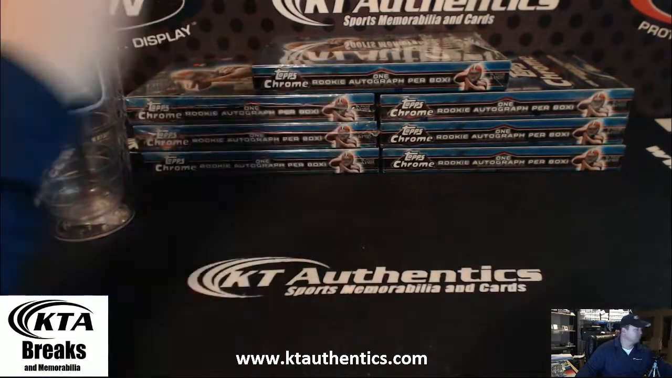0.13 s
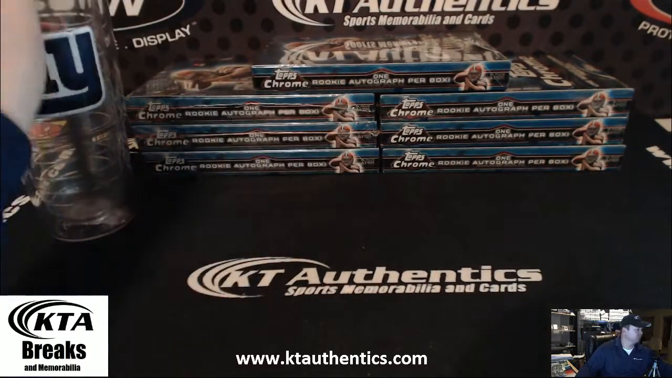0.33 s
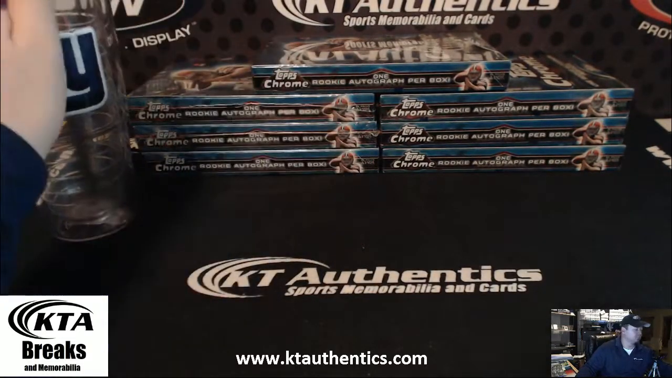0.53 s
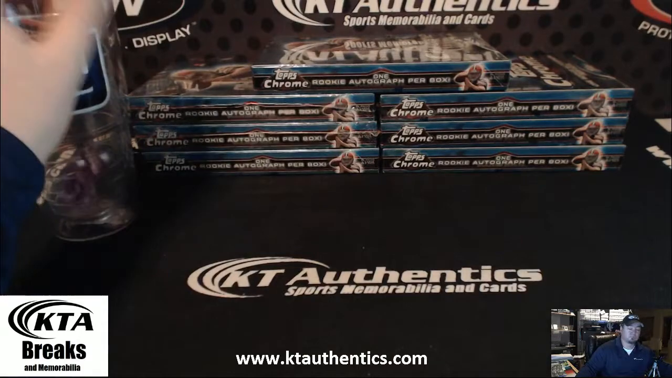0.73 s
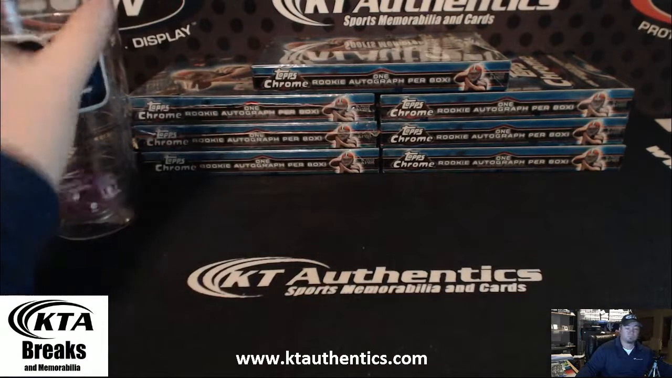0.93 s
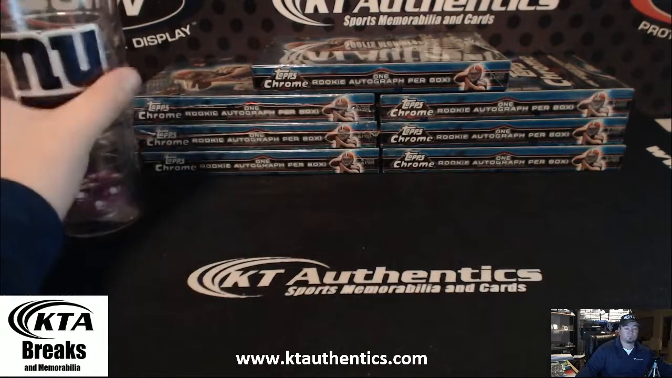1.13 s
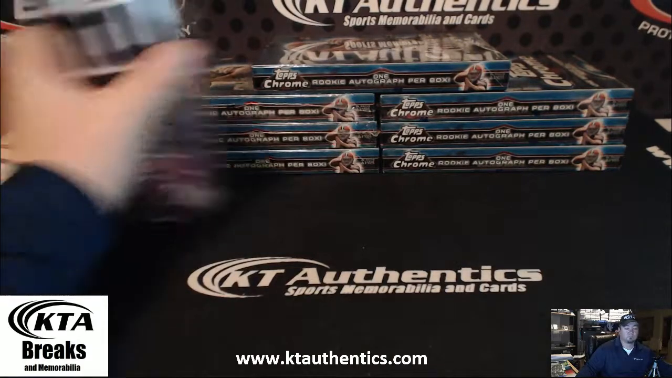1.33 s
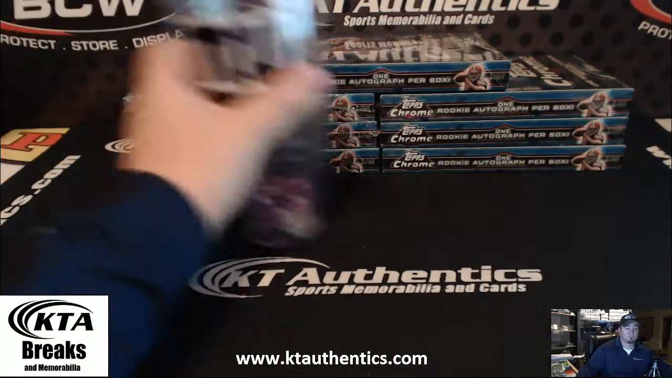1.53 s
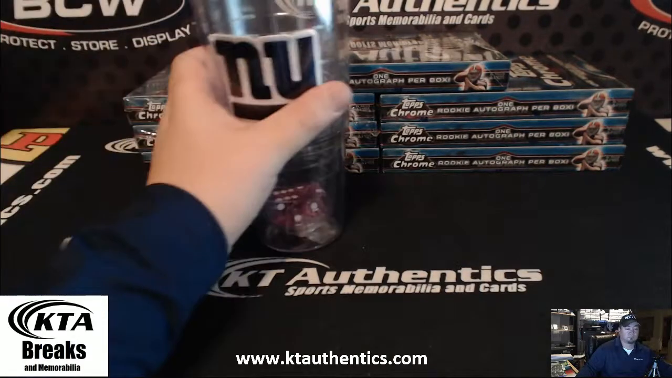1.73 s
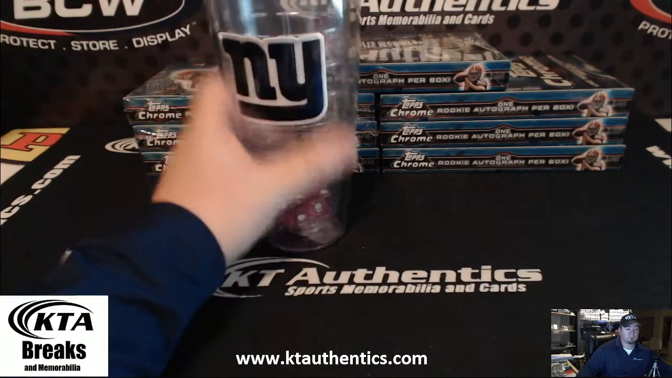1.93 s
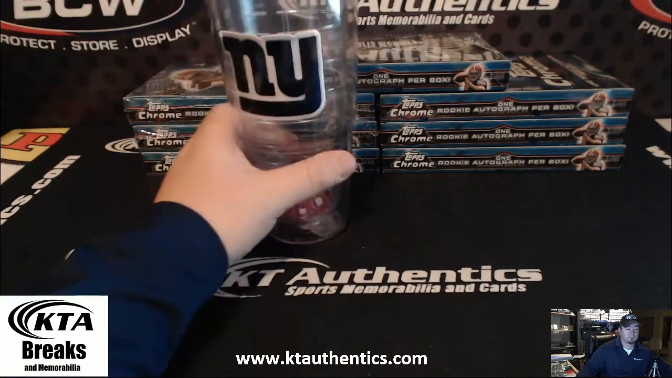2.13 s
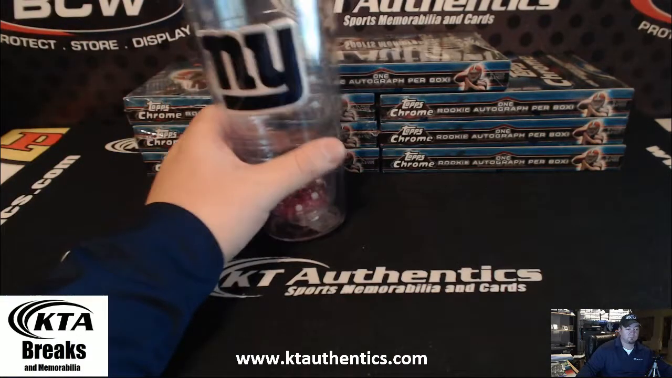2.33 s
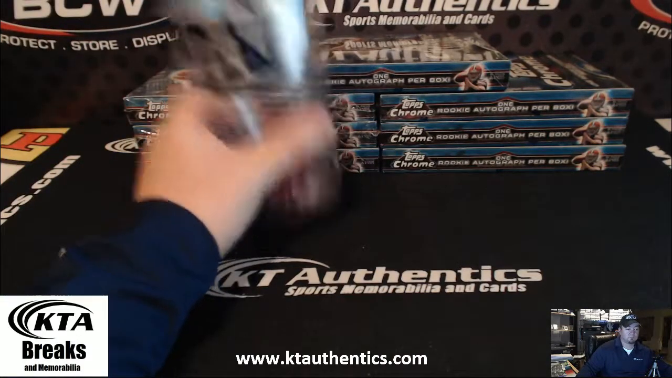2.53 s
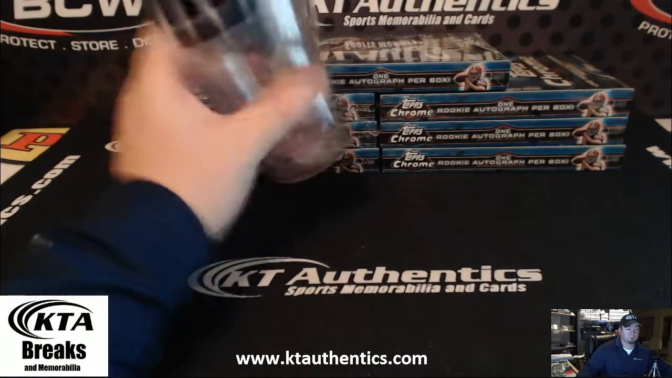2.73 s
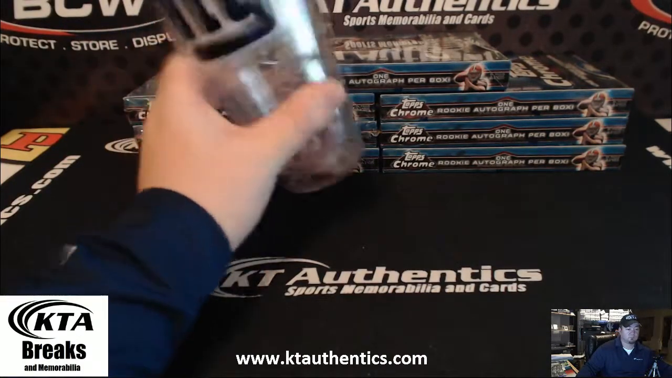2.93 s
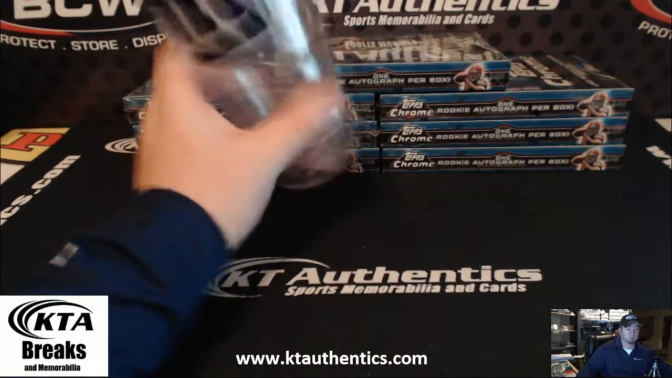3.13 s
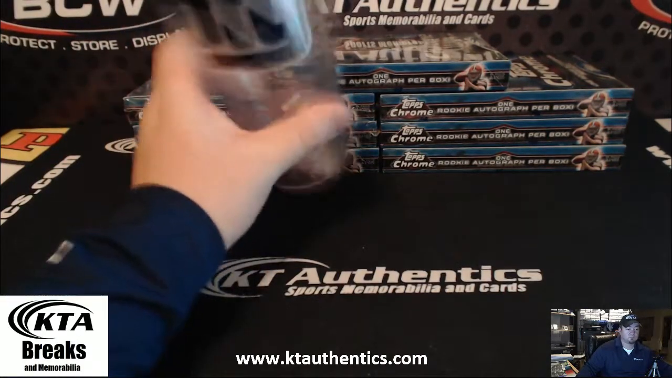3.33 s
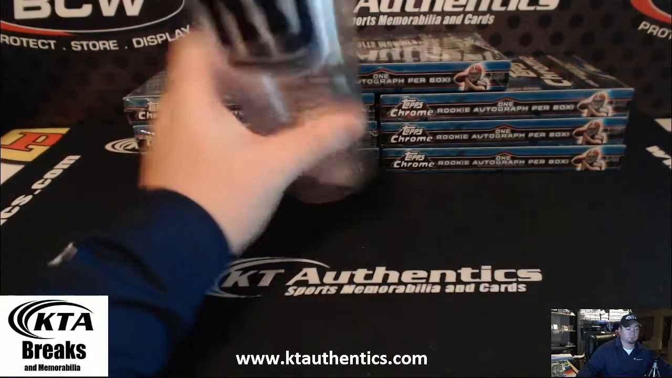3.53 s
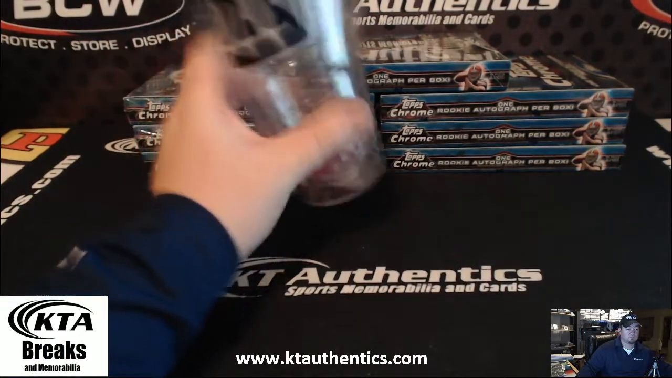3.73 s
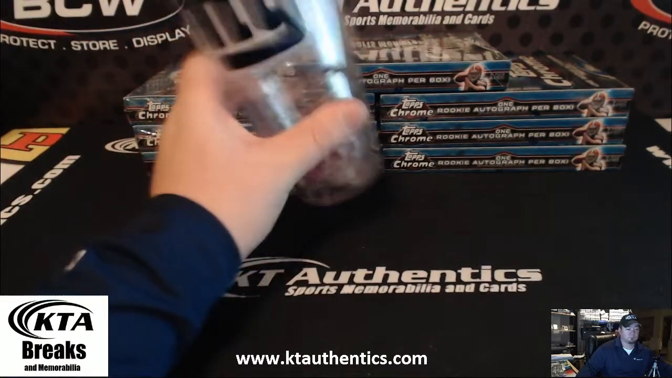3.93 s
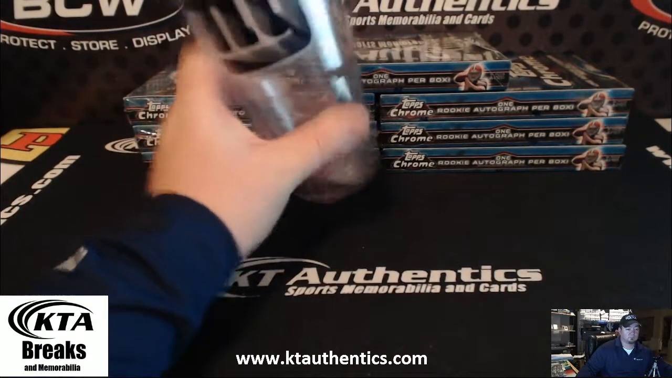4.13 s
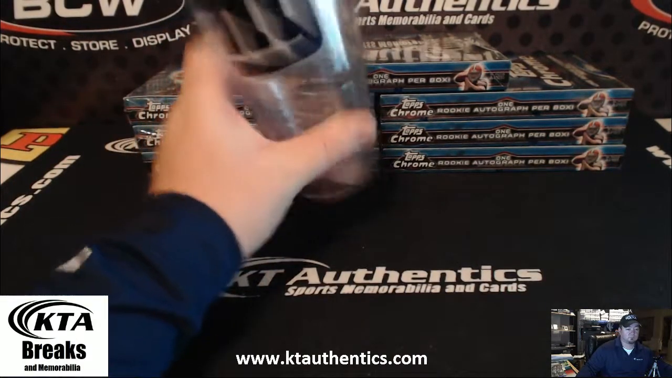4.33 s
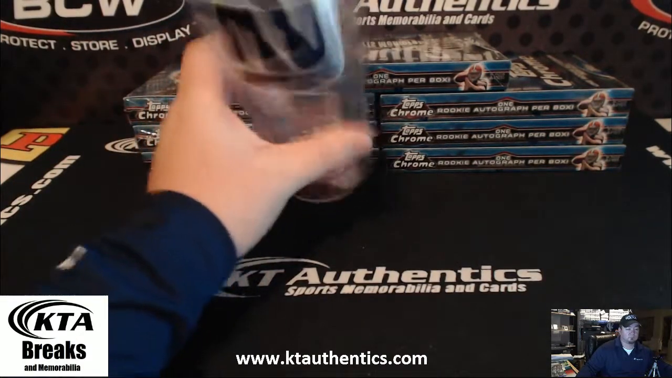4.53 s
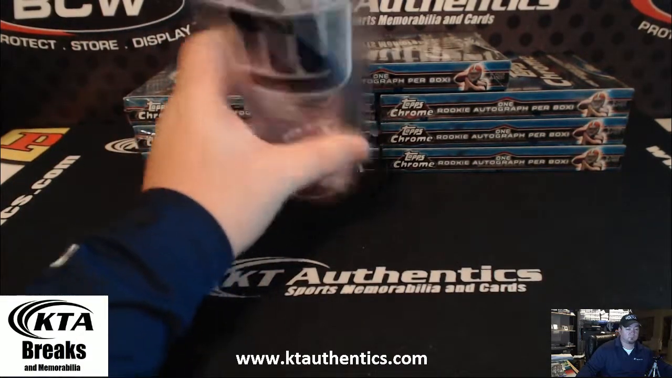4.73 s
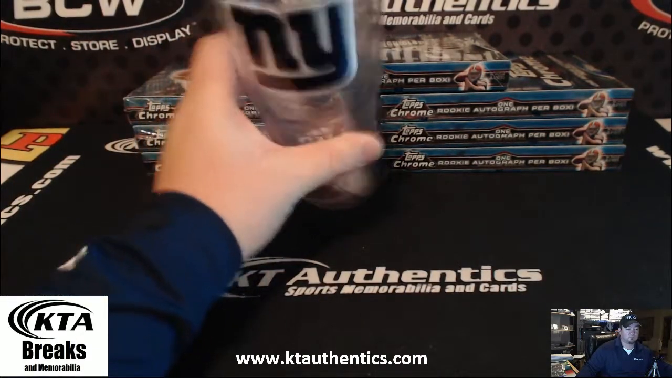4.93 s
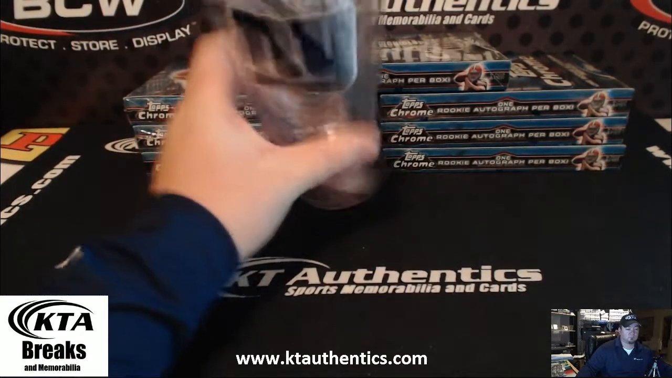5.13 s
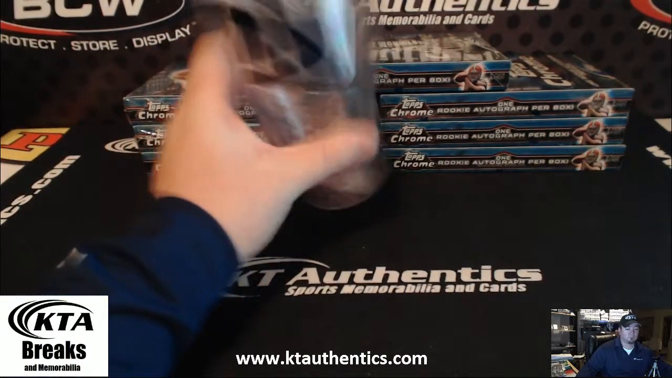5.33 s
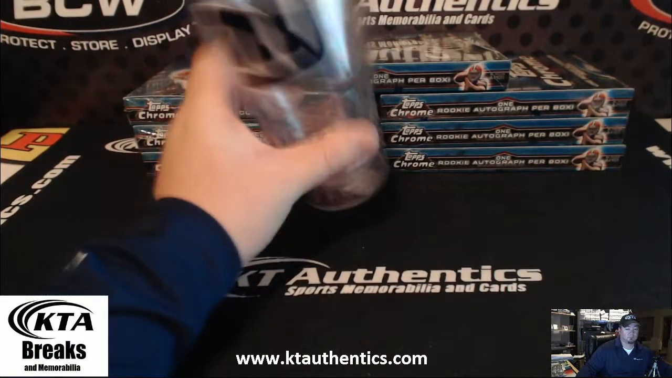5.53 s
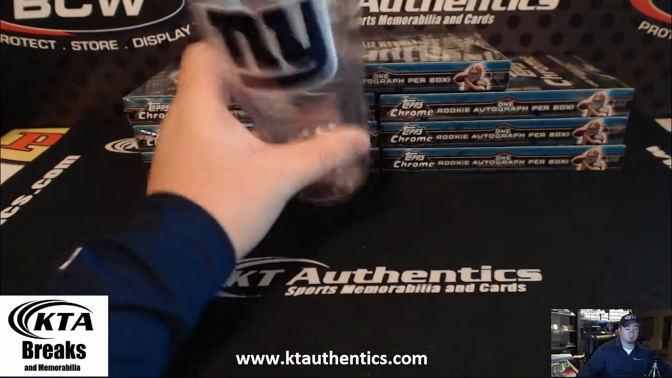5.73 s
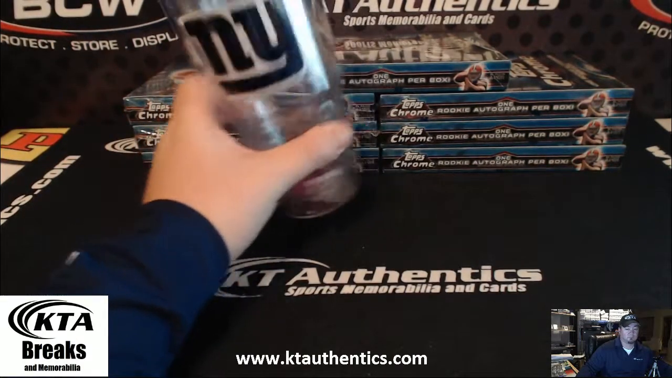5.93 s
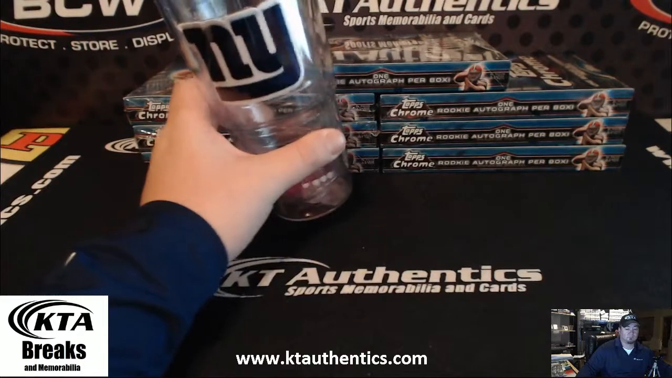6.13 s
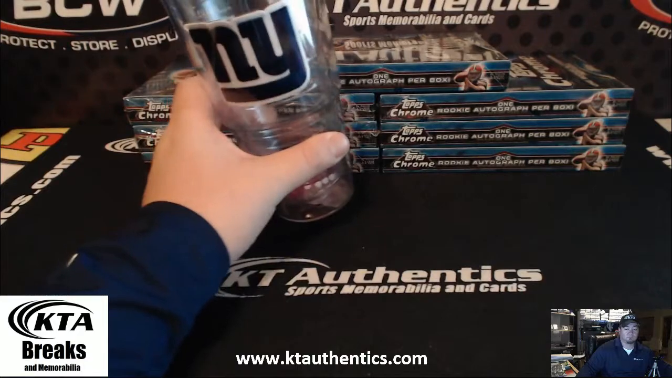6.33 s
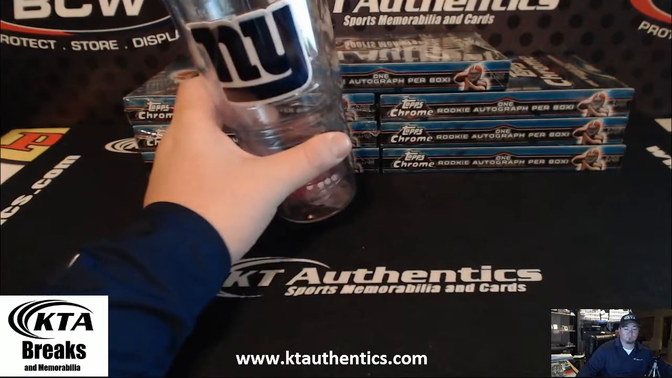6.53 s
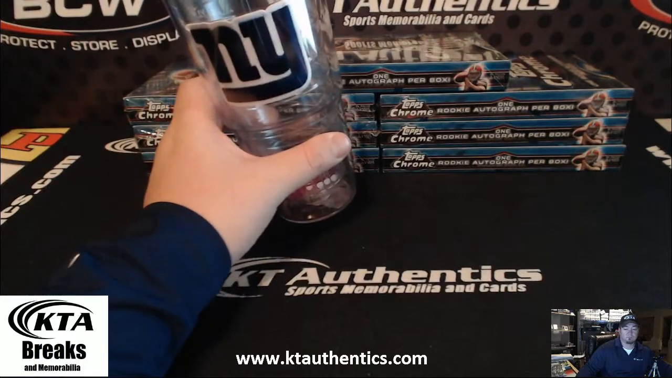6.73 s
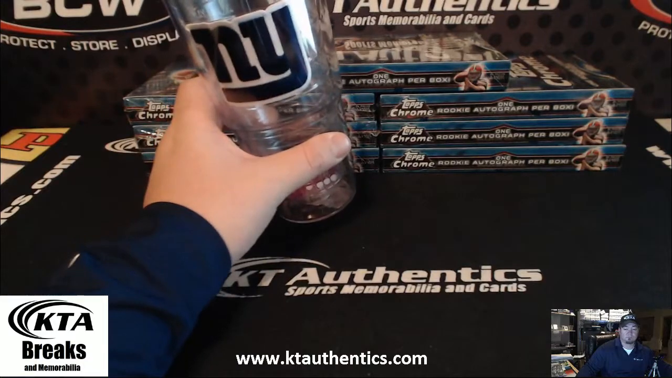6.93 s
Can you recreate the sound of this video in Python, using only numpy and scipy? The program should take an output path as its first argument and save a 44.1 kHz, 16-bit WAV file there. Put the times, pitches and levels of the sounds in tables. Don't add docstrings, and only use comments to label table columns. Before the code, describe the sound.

A quiet room with a steady low hum, heard very close. Around 0.28 to 0.42 s a few light taps sound on a hollow plastic tumbler. At about 0.49 s dice land hard inside: four sharp, ringing blows within 0.06 s, loud enough to distort, with a deep table thump. Bounces scatter and weaken until about 0.9 s. From 1 to 2.5 s there is mostly hum, a faint cloth brush near 1.3 and 1.85 s, and a soft low forearm thud at 1.5 s. At about 2.55 s rapid shaking begins, roughly twelve blows a second: hollow plastic clacks around a midrange air resonance, bright dice clicks and dense small rattles between. It is strongest until 3.7 s, then eases, softer and more muffled with occasional louder knocks near 5.25 s, stopping around 5.7 s. Dull table thuds pulse beneath, fading by 6.5 s into hum.

```python
import sys
import numpy as np
from scipy import signal
from scipy.fft import rfft, irfft, next_fast_len
from scipy.io import wavfile

SR = 44100
rng = np.random.default_rng(int(sys.argv[2]) if len(sys.argv) > 2 else 0)


def gain_from_db(level_db):
    decades = np.asarray(level_db, float) / 20
    return 10 ** decades


def materialize(psi):
    bounded = np.clip(np.atleast_2d(psi).T, -1, 1)
    quanta = np.round(bounded * 32767).astype(np.int16)
    wavfile.write(sys.argv[1], SR, quanta)


N = 308259

# (time [s], wall ring [dB], air column [dB], base knock [dB], die click [dB])
TAP_BLOWS = [
    (0.282, -24.5, -24.5, -37, -68),
    (0.3391, -29, -31, -36.5, -42.5),
    (0.3827, -24.5, -25, -17, -22.5),
    (0.4244, -26, -31, -30, -37),
]
LANDING_BLOWS = [
    (.4866, 11, -16, -10, 0),
    (.5015, -22, -1, -13, -18),
    (.5245, 10, -10, -20, -14),
    (.5445, -22, -1, -11, -14),
]
DROP_BLOWS = [(0.5801, -33, -17, -15, -51), (0.62, 1.5, -13, -14, -21.5), (0.655, -7, -12, -32, -37),
              (0.6816, -9.5, -11.5, -22.5, -35), (0.7083, -25, -20, -33, -33),
              (0.7346, -1.5, -10.5, -14.5, -19), (0.7524, -12, -16, -45, -41), (0.772, -19, -20, -53, -40),
              (0.8082, -20.5, -19.5, -21.5, -37), (0.844, -23.5, -29, -47, -36),
              (0.8752, -25, -25, -38, -47)]
HARD_SHAKE_BLOWS = [(2.555, -28, -25.5, -18, -32), (2.5732, -26.5, -18.5, -22.5, -26),
                    (2.633, -24, -20.5, -43, -54), (2.65, -3, -7, -15, -15.5),
                    (2.7359, -10.5, -10, -12.5, -16.5), (2.807, -2.5, -9, -8.5, -33),
                    (2.8241, -38, -13, -35, -15), (2.8929, -15, -6, -17.5, -9.5),
                    (2.9505, -6.5, -12.5, -16.5, -43), (2.972, -16, -15.5, -46, -15.5),
                    (3.0533, -15, -6, -16.5, -20.5), (3.1233, -11, -11.5, -20.5, -27),
                    (3.2119, -29, -23, -16.5, -35), (3.2288, -9.5, -10.5, -27, -13.5),
                    (3.284, -3, -10.5, -15, -24), (3.314, -18, -11, -14.5, -11),
                    (3.377, -23, -8.5, -21, -23), (3.3904, -11.5, -17, -10, -23),
                    (3.4516, -20, -17.5, -39, -36), (3.47, -3, -7, -16.5, -13),
                    (3.5605, -10.5, -11, -20, -14), (3.6319, -10, -9, -21, -14.5),
                    (3.7111, -18, -8, -26, -24), (3.7237, -16, -15, -23.5, -24)]
EASING_SHAKE_BLOWS = [(3.8055, -8.5, -10, -27, -29), (3.8184, -24, -24, -32, -29),
                      (3.9082, -15, -11, -20, -12.5), (3.945, -17, -13.5, -17.5, -22),
                      (3.975, -12.5, -20, -39, -23), (3.9859, -13.5, -15.5, -37, -44),
                      (4.0476, -53, -21.5, -22, -46), (4.0728, -21, -12.5, -33, -19.5),
                      (4.166, -17.5, -11.5, -27, -40), (4.2346, -34, -27.5, -26, -47),
                      (4.3325, -22, -17, -26, -34), (4.4519, -29, -14, -27, -47),
                      (4.5195, -16, -15.5, -37, -33), (4.5883, -32, -12, -24.5, -41),
                      (4.636, -21.5, -16.5, -28, -35), (4.675, -15.5, -24, -15, -36),
                      (3.741, -16, -17.5, -34, -33), (4.106, -44, -23.5, -29, -45),
                      (4.2154, -34, -34, -32, -47), (4.3051, -40, -28.5, -28, -52),
                      (4.473, -32, -35, -24, -46), (4.4917, -20, -28, -33, -53),
                      (4.5352, -38, -24, -43, -28), (4.622, -20.5, -15.5, -34, -35)]
SOFT_SHAKE_BLOWS = [(4.702, -19, -12, -55, -25), (4.7672, -18, -19, -19.5, -44),
                    (4.7993, -27, -12, -49, -18.5), (4.898, -27, -11.5, -33, -28.5),
                    (4.9667, -16, -13, -19, -25.5), (5.0464, -26, -26, -20.5, -34),
                    (5.0647, -13.5, -16, -24, -34), (5.1533, -40, -17.5, -36, -38),
                    (5.1816, -24, -17.5, -28, -45), (5.2032, -30, -20.5, -23, -32),
                    (5.2482, -8.5, -6, -21, -27), (5.2824, -42, -26, -29, -31),
                    (5.3473, -40, -14, -25, -31), (5.367, -27, -11, -46, -19.5),
                    (5.3983, -21, -24, -9.5, -23), (5.4342, -16.5, -21, -30, -42),
                    (5.5341, -25, -14.5, -29.5, -39), (5.5717, -21.5, -16, -20, -33),
                    (5.6029, -21, -16.5, -22.5, -32), (5.6516, -20, -33, -30, -56)]
# (time [s], effort [dB])
ROLL_EFFORT = [
    [(.27, -68), (.45, -63), (.58, -49), (.66, -29), (.8, -32), (1.0, -63)],
    [(2.52, -49), (2.64, -32), (2.8, -21), (3.7, -22.5), (4.3, -25.5), (4.6, -22.5), (5.1, -24), (5.6, -24),
     (5.76, -54)],
]

# (frequency [Hz], level [dB], T60 [s])
COVERED_AIR_MODES = [(317, -9.5, 0.049), (373.8, -5, 0.14), (415.8, -13, 0.12), (447, -17, 0.11),
                     (522, -6.5, 0.1), (625, -6.5, 0.02), (776, -12, 0.029)]
# (frequency [Hz], level [dB], T60 [s])
OPEN_AIR_MODES = [(505, 7, 0.16)]
# (frequency [Hz], level [dB], T60 [s])
SHADED_AIR_MODES = [(492, 1, .06), (593, 3.5, 0.099)]
# (frequency [Hz], level [dB], T60 [s])
WALL_MODES = [(1190, -11, .045), (1250, -12, .05), (1297, 0, .075), (1312, -19, .3), (1326, 0, .085),
              (1390, -9, .045)]
RIM_MODES = [(1525.5, -4, 0.069), (1662, -9, 0.073), (1810.5, -4, 0.064), (1906, -9, 0.078)]
BASE_MODES = [(2187, -6.5, 0.037), (2870, -0.5, 0.029), (3227, -9, 0.062), (3690, -34, .03),
              (4340, -33, 0.016), (4450, -3.5, 0.033)]
DIE_MODES = [(5500, -10, .025), (5850, -7, .03), (6400, -8, .03), (6950, -10, .025), (7700, -14, .02),
             (11000, -22, .012)]
# (low edge [Hz], high edge [Hz], level [dB])
KNOCK_CLUSTERS = [(2333, 2560, -6), (2710, 2917, -1), (3070, 3510, -4), (3770, 4274, -6.5),
                  (4330, 4800, -10)]
CRACK_CLUSTERS = [(4500, 5440, -7.5), (5480, 6100, 0.5), (6180, 6800, -1), (6940, 7600, -7.5),
                  (8100, 8800, -12)]
# (low edge [Hz], high edge [Hz], level [dB])
TICK_CLUSTERS = [(1970, 3400, -0.5), (3350, 5100, 0)]

# (time [s], peak level [dB])
TABLE_THUMPS = [(0.252, -23), (0.373, -23), (0.502, -2), (0.581, -8.5), (0.977, -32), (1.208, -28),
                (1.495, -16), (2.655, -25), (2.879, -17), (3.011, -19), (3.182, -21), (3.377, -17.5),
                (3.687, -19), (3.884, -18.5), (4.051, -27), (4.403, -20), (4.57, -27), (4.754, -15.5),
                (4.928, -17), (5.099, -21.5), (5.295, -15.5), (5.482, -18), (5.666, -20), (5.842, -23.5),
                (6.012, -22.5), (6.237, -32), (6.55, -38),
                (0.661, -10),
    (0.737, -10),
    (0.822, -17.5),
    (0.891, -50),
    (4.239, -28),
]
# (frequency [Hz], level [dB], T60 [s])
TABLE_MODES = [(74.8, 1, 0.43), (90.2, -8.5, 0.36), (115.7, -5.5, 0.26)]
# (time [s], level [dB], frequency [Hz], T60 [s])
FOREARM_LANDING = (1.497, -17, 32, .25)
# (centre [s], half length [s], level [dB], low edge [Hz], high edge [Hz])
SLEEVE_SWISHES = [
    (1.3, .12, -66, 4500, 7500),
    (1.84, .07, -66, 4000, 15000),
]
# (frequency [Hz], density [dB per Hz])
HUM_SPECTRUM = [(25, -2), (43, -11.5), (66, -0.5), (92, -10.5), (120, 0.5), (150, -8), (500, -14.5),
                (750, -13.5), (1070, -20.5), (2500, -27), (3100, -38), (8600, -39), (10500, -43),
                (16000, -52)]

SHADED_S, COVERED_S, SHAKEN_S = 0.36, 0.46, 2
VALLEY_HZ = 1032


def blows():
    tables = [TAP_BLOWS, LANDING_BLOWS, DROP_BLOWS, HARD_SHAKE_BLOWS, EASING_SHAKE_BLOWS, SOFT_SHAKE_BLOWS]
    time_s, wall_db, air_db, base_db, die_db = np.vstack(tables).T
    rim_offset_db = np.where(time_s > SHAKEN_S, -7.5, -18)
    rim_db = 0.4 * wall_db + 0.36 * air_db + rim_offset_db
    return np.array([np.round(time_s * SR), wall_db, rim_db, air_db, base_db, die_db])


def tumbling(hits, per_s):
    early_db, early_t60_s = -19, 0.07
    rebound_db, rebound_t60_s = -14, 0.12
    roll_bright_db = -10.5
    contact_scatter_db = 3.5

    at = np.flatnonzero(rng.random(N) < per_s / SR)
    size_db = 3.44 * np.minimum(rng.exponential(1, N), 2.4)[at]
    size_db = size_db + contact_scatter_db * rng.standard_normal((5, len(at)))

    effort_db = np.full(len(at), -120.)
    for time_s, level_db in map(np.transpose, ROLL_EFFORT):
        rolling = (at > time_s[0] * SR) & (at < time_s[-1] * SR)
        effort_db[rolling] = np.interp(at[rolling] / SR, time_s, level_db)

    hit_at = hits[0].astype(int)
    blow = np.array([np.bincount(hit_at, gain_from_db(np.minimum(db, -13)), N) for db in hits[1:]]) + 1e-18
    rebound_decay = gain_from_db(-60 / (rebound_t60_s * SR))
    after = signal.lfilter([gain_from_db(rebound_db)], [1, -rebound_decay], blow)
    early_decay = gain_from_db(-60 / (early_t60_s * SR))
    before = signal.lfilter([gain_from_db(early_db)], [1, -early_decay], blow[:, ::-1])[:, ::-1]
    sample = np.arange(N)
    near = after * (sample > COVERED_S * SR) + before * (sample > (SHAKEN_S + 0.6) * SR)

    below_db = np.array([[-11.5], [-17.5], [-12.5], [roll_bright_db - 10.0], [roll_bright_db - 20.0]])
    levels_db = 20 * np.log10(gain_from_db(effort_db + below_db) + near[:, at]) + size_db
    return np.vstack([at, levels_db])[:, effort_db > -100]


def tumbler(at, wall_db, rim_db, air_db, base_db, die_db):
    covered, bare = at > COVERED_S * SR, at < SHADED_S * SR
    shaded = ~covered & ~bare
    air = struck(at[covered], air_db[covered] - 0.6, COVERED_AIR_MODES, 2.08, detune=0.018, spread_s=0.001874)
    air = air + struck(at[bare], air_db[bare] - 0.6, OPEN_AIR_MODES, 0.3)
    air = air + struck(at[shaded], air_db[shaded] - 0.6, SHADED_AIR_MODES, 0.4)

    held = at > SHAKEN_S * SR
    gripped_modes = [(hz, db, t60_s * 0.9) for hz, db, t60_s in WALL_MODES]
    free_wall = struck(at[~held], wall_db[~held] - 4, WALL_MODES, 1.5, detune=0.004)
    free_wall = band(free_wall, [1180, 1440], "band", order=1)
    held_wall = struck(at[held], wall_db[held] - 3.5, gripped_modes, 2.9, detune=0.0086, spread_s=0.001502)
    wall = band(free_wall + held_wall, [1050, 1480], "band", order=1)
    rim = struck(at, rim_db - 2.0, RIM_MODES, 3.9, detune=0.022, spread_s=0.002022)

    knock = struck(at, base_db - 11.0, BASE_MODES, 5.3, detune=0.019, spread_s=0.002)
    knock = knock + crack(at, base_db + 1.0, 0.06, KNOCK_CLUSTERS, scatter_db=6)

    click = struck(at, die_db - 2, DIE_MODES, 4.6, detune=0.031, spread_s=0.004)
    click = click + crack(at, die_db - 1, 0.077, CRACK_CLUSTERS, scatter_db=3.0)
    click = click + crack(at, 1.49 * die_db + 0.5, 0.15, [(9290, 13900, -19.5)], scatter_db=-1.5)

    tick = crack(at, base_db + 4.5, 0.011, TICK_CLUSTERS, scatter_db=3.5)

    return (band(air, [260, VALLEY_HZ], "band")
            + band(wall + rim, [0.98 * VALLEY_HZ, 2300], "band")
            + band(knock, [1900, 5500], "band")
            + band(click, [4800, 12500], "band")
            + band(tick, 6450, "low", order=4))


def struck(at, level_db, modes, scatter_db, detune=0, spread_s=0):
    chance = rng.standard_normal((len(at), 2, len(modes)))
    side, tight = np.sign(rng.standard_normal((len(at), 2))).T
    out = np.zeros(N)
    for k, (hz, mode_db, t60_s) in enumerate(modes):
        size = side * gain_from_db(level_db + mode_db + scatter_db * chance[:, 0, k])
        start = at + (np.abs(chance[:, 1, k]) * spread_s * SR).astype(int)
        for grip in (-1, 1):
            clicks = np.bincount(start[tight == grip], size[tight == grip], N)
            out += ring(clicks, hz * (1 + grip * detune), t60_s)
    return out


def ring(clicks, hz, t60_s):
    decay = gain_from_db(-60 / (t60_s * SR))
    turn = 2 * np.pi * hz / SR
    return signal.lfilter([0, np.sin(turn)], [1, -2 * decay * np.cos(turn), decay * decay], clicks + 1e-18)


def crack(at, level_db, t60_s, clusters, scatter_db):
    chance = rng.standard_normal((len(at), len(clusters)))
    noise = rng.standard_normal(N)
    decay = gain_from_db(-60 / (t60_s * SR))
    out = 0
    for k, (low_hz, high_hz, cluster_db) in enumerate(clusters):
        clicks = np.bincount(at, gain_from_db(level_db + cluster_db + scatter_db * chance[:, k]), N)
        fade = signal.lfilter([1], [1, -decay], clicks + 1e-18)
        out = out + band(fade * noise, [low_hz, high_hz], "band")
    return out


def band(x, hz, kind, order=2):
    return signal.sosfilt(signal.butter(order, hz, kind, fs=SR, output="sos"), x)


def table():
    time_s, level_db = np.array(TABLE_THUMPS).T
    at = (time_s * SR).astype(int)
    boom = struck(at, level_db - 8.0, TABLE_MODES, scatter_db=2.5, spread_s=0.0029)
    boom = band(boom, 63, "high", order=3)
    landing_s, landing_db, hz, t60_s = FOREARM_LANDING
    boom += ring(gain_from_db(landing_db) * (np.arange(N) == int(landing_s * SR)), hz, t60_s)
    return band(boom, [24, 170], "band")


def sleeve():
    time_s = np.arange(N) / SR
    out = np.zeros(N)
    for centre_s, half_s, level_db, low_hz, high_hz in SLEEVE_SWISHES:
        swell = np.exp(-((time_s - centre_s) / half_s) ** 2)
        cloth = rms_one(band(rng.standard_normal(N), [low_hz, high_hz], "band"))
        out += gain_from_db(level_db) * swell * cloth
    return out


def room(x):
    t60_s, wall_cut_hz = 0.5, 12000
    size = next_fast_len(N + SR)
    phase = -2j * np.pi * np.arange(size // 2 + 1) / size
    dull = np.exp(-2 * np.pi * wall_cut_hz / SR)
    loss = (1 - dull) / (1 - dull * np.exp(phase))
    tail = 0
    for k, lag in enumerate((rng.uniform(0.015, 0.045, 10) * SR).astype(int)):
        loop = gain_from_db(-60 * lag / SR / t60_s) * loss * np.exp(phase * lag)
        tail = tail + (-1) ** k * loop / (1 - loop)
    return irfft(rfft(x, size) * tail, size)[:N]


def room_hum():
    return gain_from_db(-41.5) * rms_one(coloured(rng.standard_normal(N), HUM_SPECTRUM))


def coloured(x, points):
    size = next_fast_len(N)
    hz = np.maximum(np.arange(size // 2 + 1) * SR / size, 1)
    point_hz, point_db = np.array(points).T
    gain = gain_from_db(np.interp(np.log(hz), np.log(point_hz), point_db))
    return irfft(rfft(x, size) * gain, size)[:N]


def rms_one(x):
    return x / np.sqrt(np.mean(x ** 2) + 1e-20)


def scene():
    hits = blows()
    at, *levels_db = np.hstack([hits, tumbling(hits, per_s=140)])
    dice = tumbler(at.astype(int), *levels_db)
    reverb = gain_from_db(-18) * room(dice)
    return (dice + reverb + table() + sleeve() + room_hum())[None]


def band_limit(x):
    return signal.sosfilt(signal.butter(12, 16130, fs=SR, output="sos"), x)


def record(dry):
    overload, cutoff_hz = 0.7, 16100
    clipped = dry / (1 + (np.abs(dry) / overload) ** 10) ** (1 / 10)
    top_cut = signal.ellip(8, 0.5, 60, cutoff_hz, fs=SR, output="sos")
    return band_limit(signal.sosfilt(top_cut, clipped))


dry = scene()
out = record(dry)
materialize(out)
```